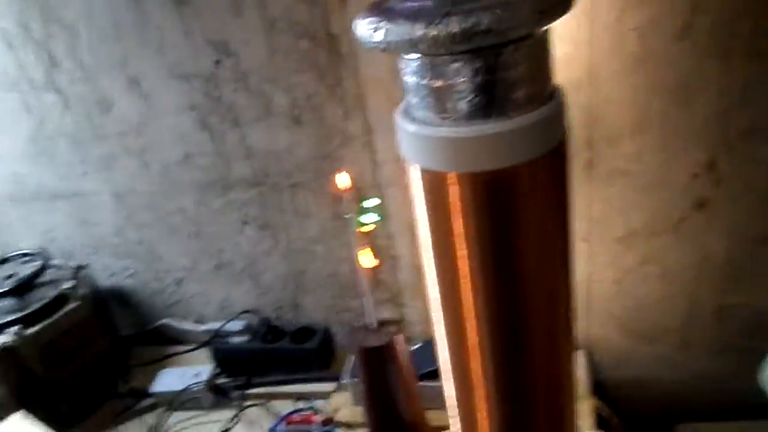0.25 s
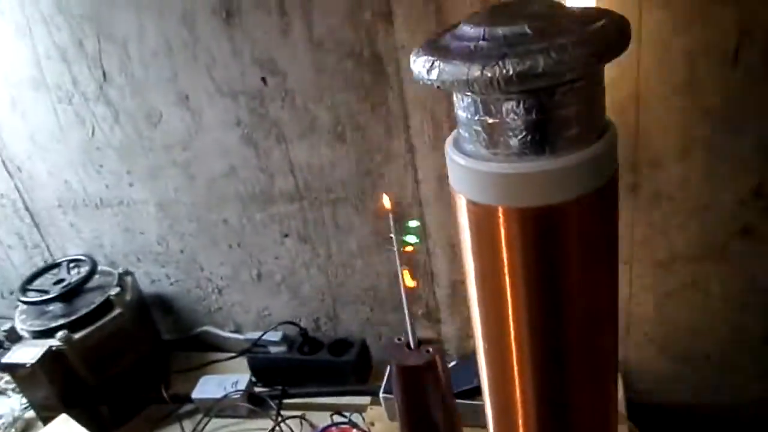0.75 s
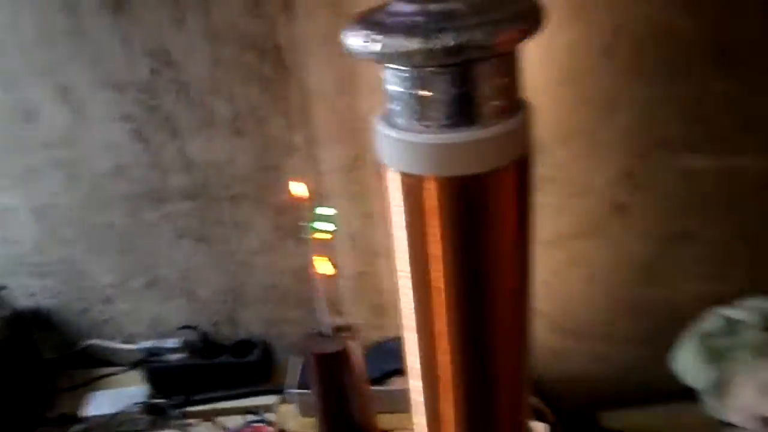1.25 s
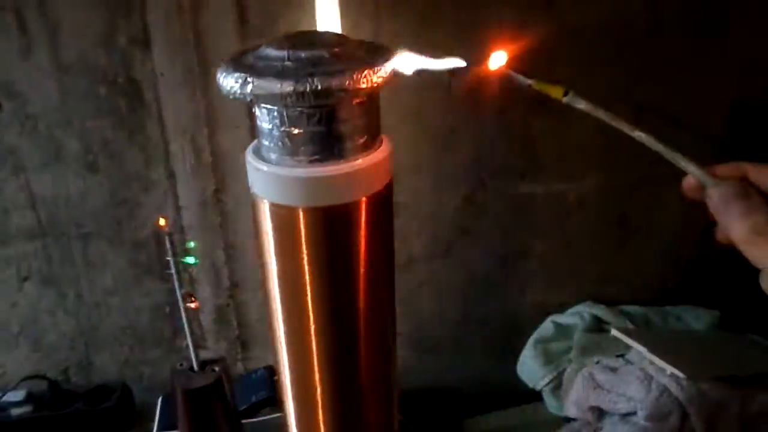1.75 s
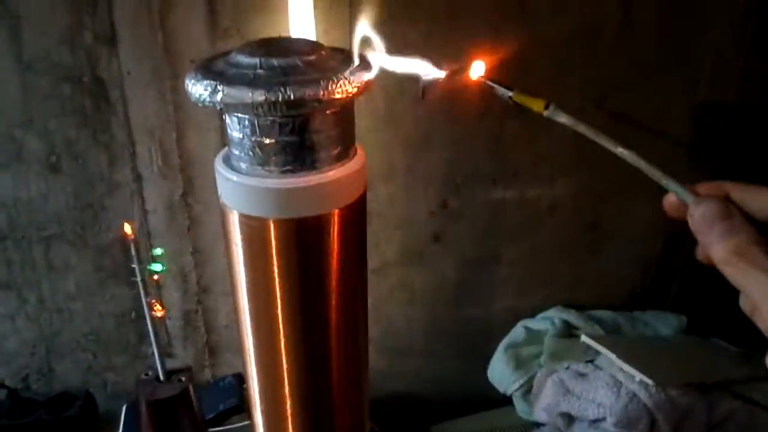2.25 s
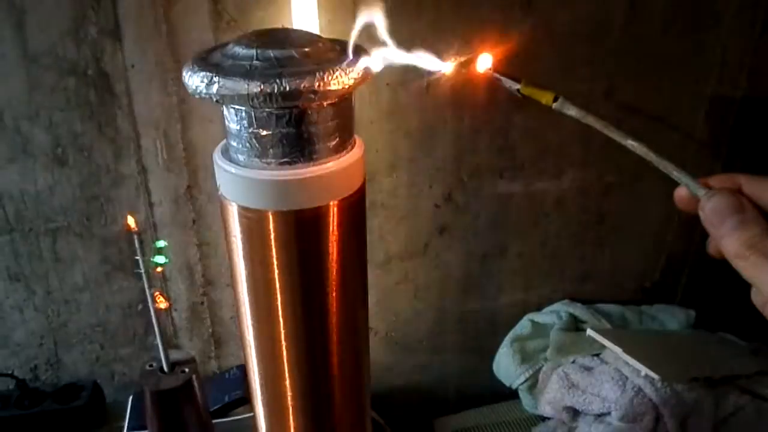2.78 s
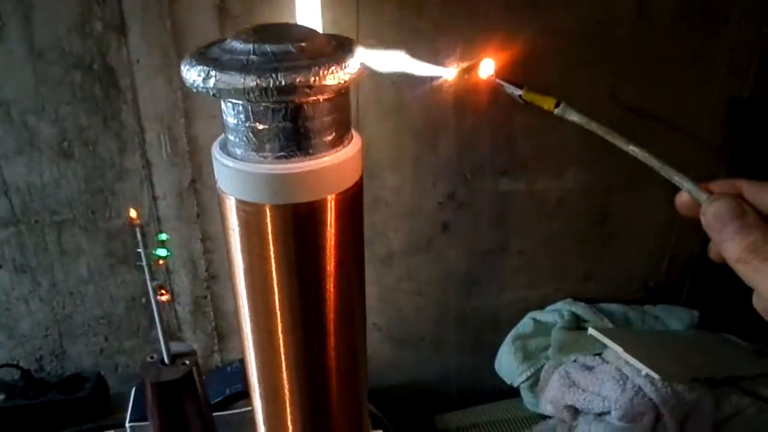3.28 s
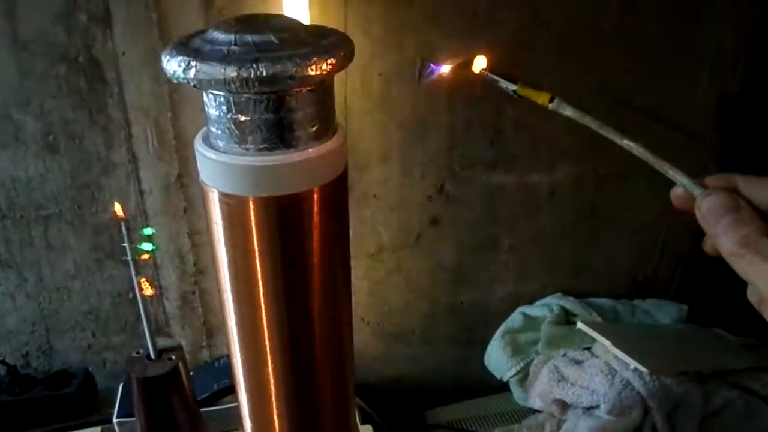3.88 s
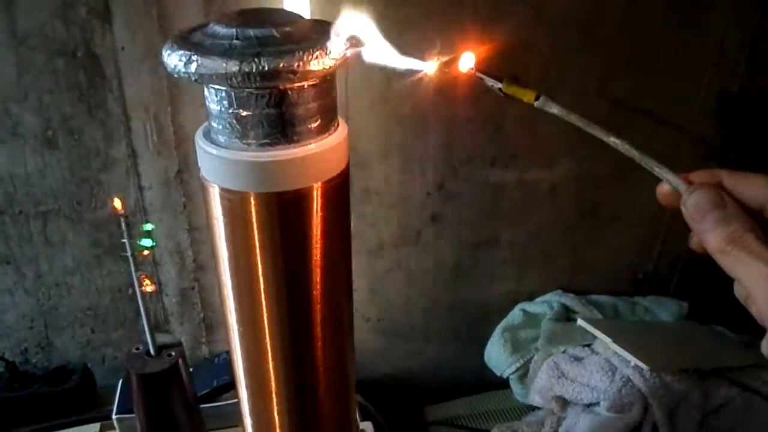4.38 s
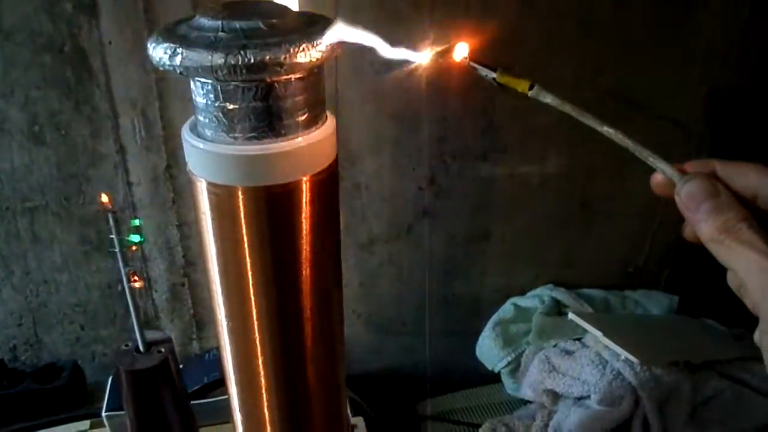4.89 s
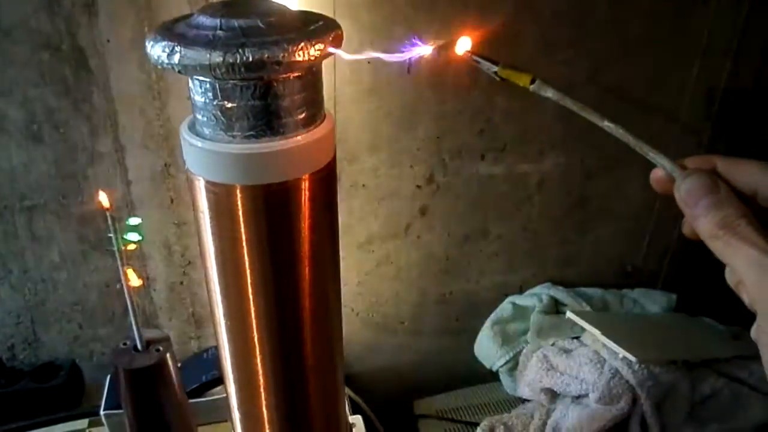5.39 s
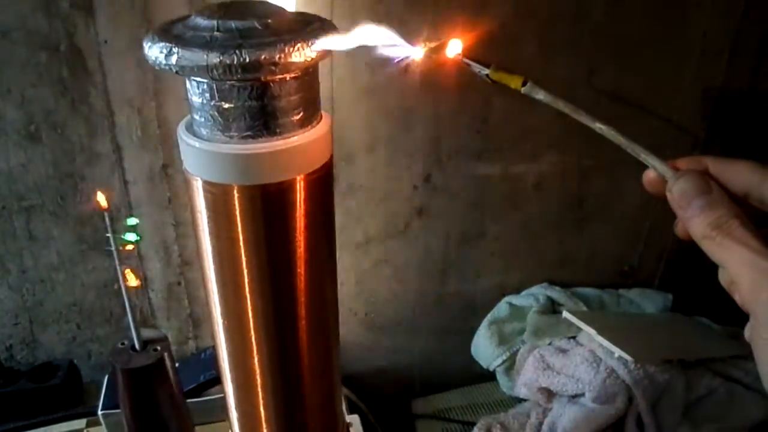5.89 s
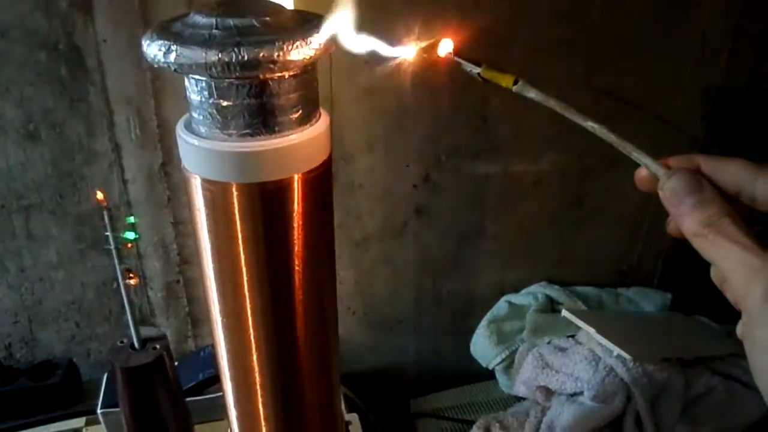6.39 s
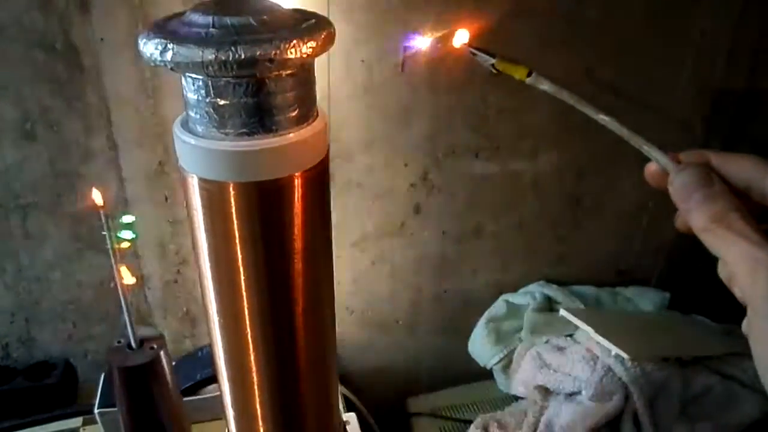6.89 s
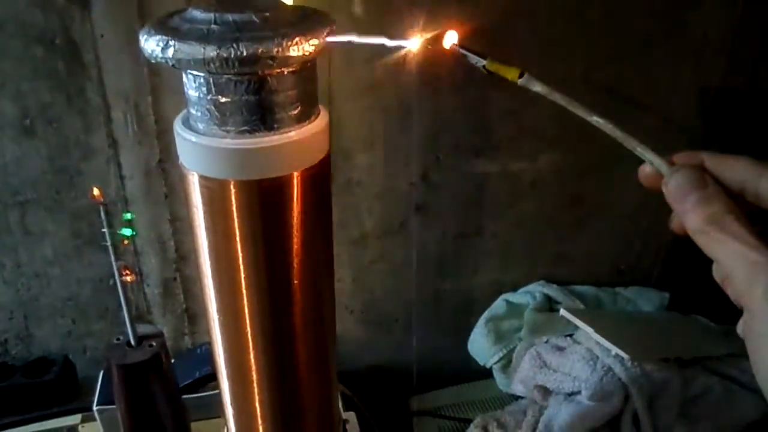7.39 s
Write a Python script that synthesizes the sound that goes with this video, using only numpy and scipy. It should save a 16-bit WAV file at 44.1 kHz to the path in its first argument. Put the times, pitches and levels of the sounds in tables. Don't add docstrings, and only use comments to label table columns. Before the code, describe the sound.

Mechanically regular electric crackling, heard close on a phone microphone in a concrete room. Hissy bursts edged by clicks run for over a second and a half, then a wire draws arcs that snap sharply with small stray crackles. The arc drops out briefly near three and a half, five and seven seconds, letting the fizz return. Short reflections and faint rumble surround it; the buzzing continues to the end.

```python
import sys
import numpy as np
from scipy import signal
from scipy.fft import rfft, irfft
from scipy.io import wavfile
from scipy.ndimage import uniform_filter1d, minimum_filter1d

SR = 44100
rng = np.random.default_rng(int(sys.argv[2]) if len(sys.argv) > 2 else 0)


def magnitude_from_level(level_db):
    exponent = np.asarray(level_db, float) / 20
    return 10 ** exponent


def unload_audio(sound):
    columns = np.transpose(np.atleast_2d(sound))
    steps = np.round(np.clip(columns, -1, 1) * 32767)
    wavfile.write(sys.argv[1], SR, steps.astype(np.int16))


N = 337365
ARC_NEARER_MS = 0.13


def unit(x):
    return x / np.sqrt(np.mean(x ** 2) + 1e-20)


def along(points, hz):
    f, v = np.transpose(points)
    return np.interp(np.log(hz + 1), np.log(f + 1), v)


def conv(x, h):
    return signal.fftconvolve(x, h)[:len(x)]


def spikes(times_s, size, count=N):
    at = np.asarray(times_s) * SR
    k = np.floor(at)[:, None] + np.arange(-7, 9)
    d = k - at[:, None]
    w = np.asarray(size)[:, None] * np.sinc(d) * np.cos(np.pi * d / 16) ** 2
    index = np.clip(k, 0, count).astype(int)
    return np.bincount(index.ravel(), w.ravel(), count + 1)[:count]


def causal(points, size=4096):
    log_gain = np.log(magnitude_from_level(along(points, np.fft.rfftfreq(size, 1 / SR))))
    c = irfft(log_gain, size)
    c[1:size // 2] *= 2
    c[size // 2 + 1:] = 0
    return irfft(np.exp(rfft(c)), size)


def noise(points):
    return unit(conv(rng.standard_normal(N), causal(points)))


def background():
    # [pitch_hz, level_db per Hz]
    air = [(20, -17), (60, -4), (200, -18), (800, -5.5), (3000, -41), (15500, -43), (16500, -54)]
    # [time_s, level_db]
    rumble = [(0, 4.5), (1.6, 7), (1.9, 3), (2.8, 2), (3.4, 7), (4.4, 2), (5.3, 7), (6.3, 1), (6.5, 12),
              (6.8, 8), (7.65, 8)]
    level_db = -66.0 + np.interp(np.arange(N) / SR, *np.transpose(rumble))
    return magnitude_from_level(level_db) * noise(air)


def tail(decays, colour, start_ms, size, order=128):
    hz, t, z = signal.stft(rng.standard_normal(size), SR, nperseg=order)
    level_db = along(colour, hz)[:, None] - 60 * t / along(decays, hz)[:, None]
    h = signal.istft(z * magnitude_from_level(level_db), SR, nperseg=order)[1]
    h = h * np.clip(np.arange(len(h)) / SR * 1000 / start_ms - 1, 0, 1)
    return h / np.linalg.norm(h)


def diffuse(x, near_db, far_db, modes_db, count=8):
    # [pitch_hz, t60_s]
    clutter = [(200, 0.01), (2000, 0.031), (12000, 0.041)]
    # [pitch_hz, level_db]
    scatter = [(300, 9), (1000, -1), (3000, 2.5), (8000, -1.5), (16000, 2.5)]
    # [pitch_hz, t60_s]
    basement = [(150, 0.95), (700, 0.059), (3000, 0.35), (12000, 0.46)]
    # [pitch_hz, level_db]
    walls = [(100, -16.5), (200, -4.5), (330, -12), (650, 6), (2000, -4.5), (6500, -6), (8000, -8.5),
             (16000, -10.5)]
    # [pitch_hz, level_db, t60_s]
    room_modes = [
        (172.3, -50.5, 0.35),
        (208.5, -38.5, 0.079),
    ]
    spot = np.repeat(rng.integers(0, count, N // 1300 + 1), 1300)[:N]
    far = magnitude_from_level(far_db) * tail(basement, walls, start_ms=5.9, size=SR // 2, order=512)
    t = np.arange(len(far)) / SR
    for hz, db, t60 in room_modes:
        far = far + magnitude_from_level(modes_db + db - 60 * t / t60) * np.sin(2 * np.pi * hz * t)
    near = [tail(clutter, scatter, start_ms=1.1, size=SR // 8) for _ in range(count)]
    scattered = sum(conv(x * (spot == k), h) for k, h in enumerate(near))
    return conv(x, far) + magnitude_from_level(near_db) * scattered


def surfaces(echoes, edges, lift_db=0):
    ms, db = np.transpose(echoes)
    h = spikes(ms / 1000, magnitude_from_level(db + lift_db), count=512)
    blur = signal.windows.gaussian(41, 5)
    ms, gain = np.transpose(edges)
    h += magnitude_from_level(1.5) * np.convolve(spikes(ms / 1000, gain, count=512), blur / blur.sum(), "same")
    h[0] += 1
    return h


def floor_dip(x, hz, sharp, depth):
    return x - depth * signal.lfilter(*signal.iirpeak(hz, sharp, SR), x)


def burns():
    # [cycle number, start_s]
    clock = [(0, .01846), (6, .55469), (13, 1.18136), (18, 1.62938), (19, 1.71912), (25, 2.25658),
             (26, 2.34608), (31, 2.79417), (34, 3.06312), (40, 3.60179), (43, 3.87027), (54, 4.85805),
             (56, 5.0373), (59, 5.30558), (64, 5.75362), (75, 6.74077), (77, 6.91973), (85, 7.63816)]
    # [time_s, level_db]
    corona = [(0, -12), (.38, -8), (.55, -8), (.76, -7), (.86, -13), (1.1, -7.5), (1.3, -9), (1.63, -5),
              (2.9, -8), (3.5, -5.5), (3.62, -7.5), (3.87, -9.5), (3.96, -6), (5, -9.5), (5.33, -6.5),
              (6, -9), (6.72, -8.5), (6.92, -6)]
    # [start_s, wait_ms, strike_db, switch_off_db,
    # late_sizzle_db]
    arc_burns = [(1.63, 9.2, -10.5, -6.5, -54), (1.72, 0.059, -2, -9, -56),
                 (1.81, 0.07, -5.5, -13, -67.5), (1.9, 0.069, -9.5, -11.5, -49),
                 (1.99, 0.038, -5.5, -15, -71), (2.08, 0.063, -10.5, -11.5, -49),
                 (2.17, 0.072, -8, -10.5, -49), (2.26, 0.38, -13, -8, -50), (2.35, 0.12, -12, -13.5, -79),
                 (2.44, 0.069, -10, -12.5, -51.5), (2.53, 0.083, -9, -12.5, -48),
                 (2.61, 0.079, -6.5, -11.5, -48), (2.7, 0.084, -6.5, -9.5, -48),
                 (2.79, 0.17, -7, -8, -46), (2.88, 0.056, -2.5, -9.4, -54), (3.06, 0.32, -6.5, -9, -56),
                 (3.15, 0.26, -9, -9.5, -50), (3.24, 0.16, -13.5, -10, -49), (3.33, 0.43, -13, -8, -43),
                 (3.42, 0.45, -9, -8, -50), (3.51, 0.7, -12, -7.5, -51.5),
                 (3.87, 62.29, -10, -7, -40), (3.96, 0.2, -8.5, -9, -52), (4.05, 0.068, -3, -10, -53),
                    (4.14, 0.16, -19, -8, -51), (4.23, 0.17, -9, -8.5, -44.5), (4.32, 0.072, -10, -12, -54),
                    (4.41, 0.078, -8.5, -10, -46), (4.5, 0.041, -4, -8.5, -50), (4.59, 0.065, -4, -10, -63),
                    (4.68, 0.1, -11, -7.5, -45), (4.77, 0.11, -9, -12.5, -68),
                    (4.86, 0.095, -10, -9.5, -52), (4.95, 2.8, -14, -10, -49),
                 (5.31, 59, -12.5, -7.5, -36), (5.4, 0.44, -13, -12, -73), (5.48, 0.062, -5.5, -9.5, -40),
                   (5.57, 8.3, -10, -9, -48), (5.66, 0.1, -3.5, -8, -44), (5.75, 0.2, -12, -9.5, -53),
                   (5.84, 9.4, -14, -8, -53), (5.93, .41, -16, -10.5, -71), (6.02, 7.17, -14.5, -11, -79),
                   (6.11, 0.12, -6.5, -14, -62), (6.2, 0.056, -6.5, -13, -45),
                   (6.29, 0.046, -7.5, -13, -60), (6.38, 0.05, -4.5, -10.5, -45),
                   (6.47, 0.24, -13, -8.5, -47), (6.56, .32, -7, -7.5, -48), (6.65, 0.28, -8, -8.5, -72),
                 (6.92, 0.62, -9, -9, -52),
        (7.01, 0.077, -4.5, -6, -41),
        (7.1, 0.15, -6.5, -9.4, -48),
        (7.19, .36, -14.5, -7.5, -46),
        (7.28, 0.39, -16, -10.5, -50),
        (7.37, 0.072, -6, -9.5, -60),
        (7.46, 0.285, -12.5, -6.5, -39),
        (7.55, 0.028, -1, -8.5, -50),
        (7.64, 0.047, -1.5, -3, -55),
    ]
    rest_ms = 25.71
    stunt_db, grow_ms = 29, 0.051
    quench_base_db, quench_follows = -12, 0.5
    stop_db = 0
    corona_hiss_db, hiss_sag_db = -34.5, -1
    arc_hiss_base_db, arc_hiss_follows = -55.5, 0.55

    cycle, start_s = np.transpose(clock)
    on = np.interp(np.arange(cycle[-1] + 1), cycle, start_s)
    full_db = np.interp(on, *np.transpose(corona))
    wait, arc_db = np.full(len(on), np.inf), np.zeros(len(on))
    off_db = full_db + stop_db
    late_db = full_db + corona_hiss_db + hiss_sag_db
    rows = np.array(arc_burns)
    struck = np.abs(on[:, None] - rows[:, 0]).argmin(0)
    wait[struck], arc_db[struck], off_db[struck], late_db[struck] = rows.T[1:]

    young = np.exp(-np.abs(wait) / grow_ms)
    corona_db = full_db - stunt_db * young
    quench_db = quench_base_db + quench_follows * arc_db
    arc_hiss_db = arc_hiss_base_db + arc_hiss_follows * (late_db - arc_hiss_base_db)
    early_db = np.where(wait > 5, full_db + corona_hiss_db, arc_hiss_db)
    off = on[1:] - (rest_ms + ARC_NEARER_MS * np.isfinite(wait[:-1])) / 1000
    return on, off, wait, corona_db, arc_db, quench_db, off_db[:-1], early_db[:-1], late_db[:-1]


def hiss():
    # [pitch_hz, level_db per Hz]
    sizzle_colour = [(100, 6.5), (500, -5), (1500, -2.5), (4000, 2.5), (8000, 2), (13000, 10.5),
                     (16000, 7.5)]
    on, off, *_, early_db, late_db = burns()
    on = on[:len(off)]
    knots = np.c_[on, on + .0005, on + .024, off - .012, off, off + .0005].ravel()
    mute = np.full(len(on), -90.)
    knot_db = np.c_[mute, early_db, early_db, late_db, late_db, mute].ravel()
    level_db = np.interp(np.arange(N) / SR, knots, knot_db)
    level_db[:int(on[0] * SR)] = -42.5
    sparks = magnitude_from_level(4 * unit(uniform_filter1d(rng.standard_normal(N), size=24)))
    return magnitude_from_level(level_db) * unit(sparks * noise(sizzle_colour))


def corona_clicks():
    on, off, wait, corona_db, _, quench_db, off_db, _, _ = burns()
    lit = np.isfinite(wait)
    bare = ~lit[:len(off)]
    grow = rng.uniform(0, .000022, len(on)) * np.clip(wait / .4, 0, 1)
    start = spikes(np.r_[on - grow, on + grow], np.tile(magnitude_from_level(corona_db - 6), 2))
    quenched = (on + wait / 1000)[lit]
    stop = -spikes(np.r_[quenched, off[bare]], magnitude_from_level(np.r_[quench_db[lit], off_db[bare]]))
    return start, stop


def arc_clicks():
    # [time_s,
    # peak_db, sign of the first swing]
    crackle = [(1.674, -19, -1), (2.123, -24, -1), (2.219, -24.6, -1), (2.6611, -23, -1), (2.7505, -18, 1),
               (2.848, -15, 1), (2.93, -23, -1), (3.032, -30, 1), (3.204, -19, 1), (3.3843, -23, 1),
               (3.4798, -21, -1), (4.1045, -25.3, -1), (4.2782, -22, 1), (4.3714, -24, -1),
               (4.4577, -24, -1), (4.5467, -21, -1), (4.7295, -28, 1), (5.541, -13, 1), (5.6198, -16, 1),
               (6.1545, -23, 1), (6.2367, -25, 1), (0.8228, -12.5, 1), (6.5167, -21, 1), (6.5925, -21, -1),
               (7.056, -11.5, 1), (7.2313, -19, 1), (7.2403, -19, -1), (7.318, -17, 1), (7.501, -17, 1),
               (7.5938, -17, 1)]
    fork_spread_ms, fork_share = 0.13, 0.5
    on, off, wait, _, arc_db, _, off_db, _, _ = burns()
    lit = np.isfinite(wait)
    arc_dies = lit[:len(off)]
    strike = (on + wait / 1000 - ARC_NEARER_MS / 1000)[lit]
    fork_ms = rng.uniform(-fork_spread_ms, fork_spread_ms, len(strike))
    fork = rng.uniform(0, fork_share, len(strike))
    strike_gain = magnitude_from_level(arc_db[lit])
    snap_s, db, sign = np.transpose(crackle)
    first = magnitude_from_level(db - 1.5 * (sign > 0) - 1)
    second = magnitude_from_level(db - 2.5 * (sign < 0) - 1)
    times = np.r_[strike, strike + fork_ms / 1000, off[arc_dies], snap_s, snap_s + .00009]
    sizes = np.r_[strike_gain * (1 - fork), strike_gain * fork, -magnitude_from_level(off_db[arc_dies]),
                  sign * first, -sign * second]
    return spikes(times, sizes)


def scene():
    # [delay_ms, level_db]
    top_echoes = [(1.65, -9.5), (4.57, -15), (6.85, -20), (8.1, -23)]
    arc_echoes = [(1.93, -16), (4.74, -17), (4.88, -18), (5.3, -19), (6.69, -20), (7.17, -19)]
    # [delay_ms, signed gain]
    top_edges = [(2.3, -.3), (2.9, .1), (3.4, .27), (3.9, -.33), (4.5, .17), (5.3, -.15)]
    arc_edges = [(2.25, -.17), (3.5, .13), (4.3, .1), (5.6, -.25), (6.3, -.08), (7.8, .1)]
    sizzle = hiss()
    start, stop = corona_clicks()
    arc = conv(arc_clicks(), [1.3, -.3])
    top = conv(start, surfaces(top_echoes, top_edges, lift_db=4))
    top += conv(stop + sizzle, surfaces(top_echoes, top_edges))
    top += diffuse(start + stop + magnitude_from_level(-4) * sizzle, near_db=-6.0, far_db=-11, modes_db=-2.5)
    wire = conv(arc, surfaces(arc_echoes, arc_edges))
    wire += diffuse(arc, near_db=-6.5, far_db=-12.5, modes_db=-8.5)
    top = floor_dip(top, hz=353, sharp=13.5, depth=0.9)
    wire = floor_dip(wire, hz=315, sharp=1.29, depth=0.71)
    return (top + wire)[None]


def thinned(x, floor_db, mask_db, from_hz):
    hz, _, z = signal.stft(x, SR, nperseg=256)
    hz, z_low = hz[:128, None], z[:128]
    power = np.abs(z_low.reshape(16, 8, -1) ** 2).sum(1)
    loudest = -minimum_filter1d(-power, size=7, axis=1, origin=-2)
    luck = magnitude_from_level(7 * unit(uniform_filter1d(rng.standard_normal(power.shape), size=5, axis=1)))
    luck[:round(from_hz / hz[8, 0])] *= magnitude_from_level(-22)
    threshold = luck * np.maximum(magnitude_from_level(2 * floor_db), magnitude_from_level(2 * mask_db) * loudest)
    keep = uniform_filter1d(power, size=2, axis=1) > threshold
    keep = np.repeat(keep, 8, axis=0)
    keep &= (hz < 15900) | (power[8] > magnitude_from_level(2 * (floor_db + 32)))
    gain = np.where(keep, 1, .05 * (hz < 16000)) * (hz < 16900)
    return signal.istft(np.r_[z_low * gain, 0 * z[128:]], SR, nperseg=256)[1][:N]


def band_limit(x):
    return signal.sosfilt(signal.butter(12, 16990, fs=SR, output="sos"), x)


def record(dry):
    # [pitch_hz, level_db]
    mic_colour = [(20, -26), (100, -17.5), (300, 4), (800, 0), (3200, -1.5), (4200, -2.5), (6200, 1.5),
                  (7000, -2), (8000, -6.5), (10000, -7), (12200, -4), (14000, -13), (15800, -16),
                  (16900, -23)]
    mic = causal(mic_colour)
    lag = np.argmax(mic)
    heard = np.roll(conv(dry[0], mic / mic[lag]), -lag) + background()
    heard = thinned(heard, floor_db=-71, mask_db=-18.5, from_hz=6800)
    return band_limit(heard[None])


dry = scene()
out = record(dry)
unload_audio(out)
```